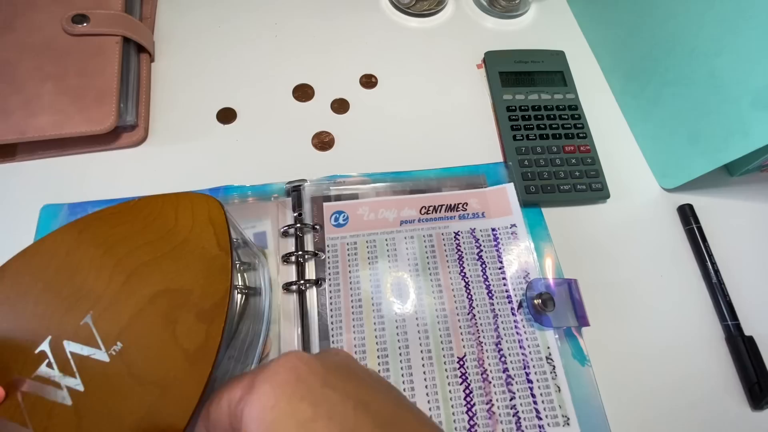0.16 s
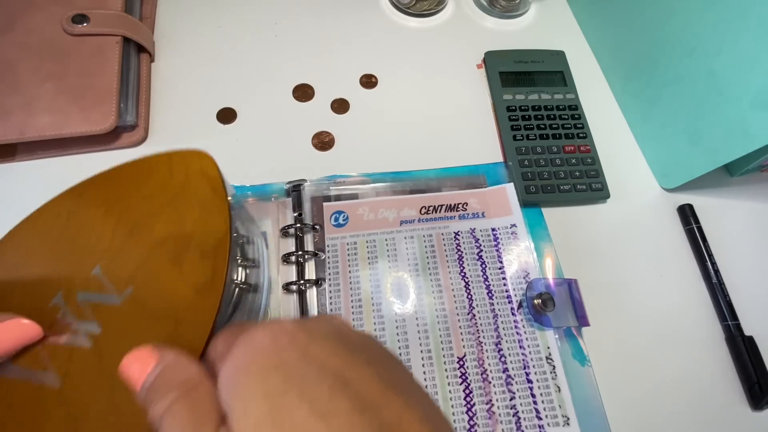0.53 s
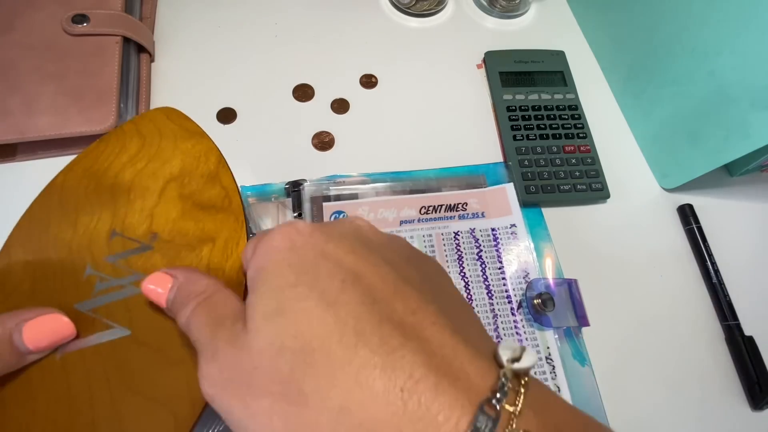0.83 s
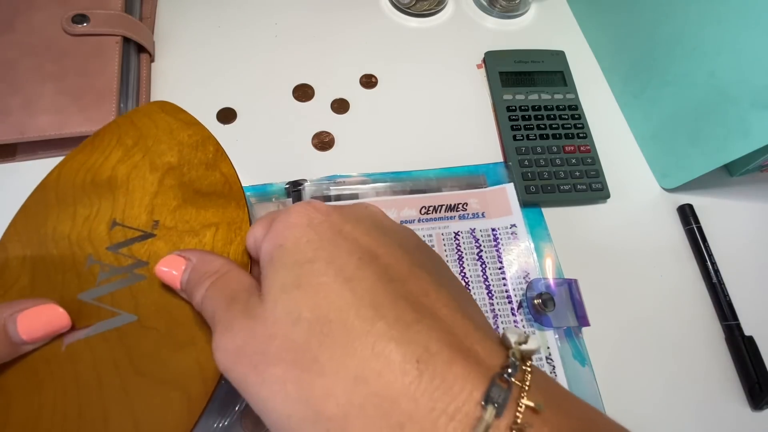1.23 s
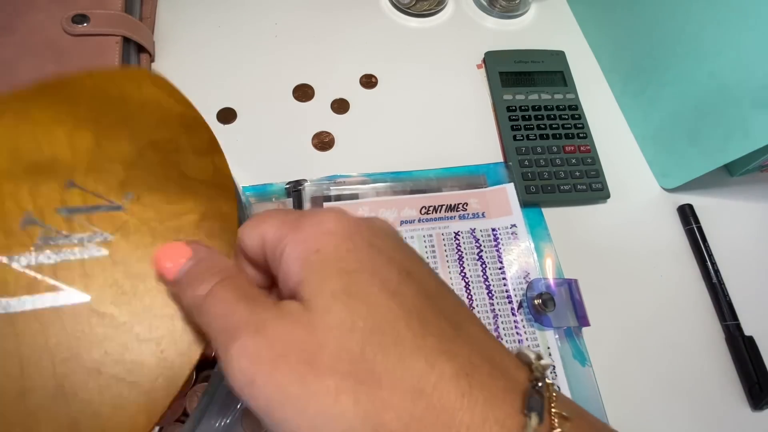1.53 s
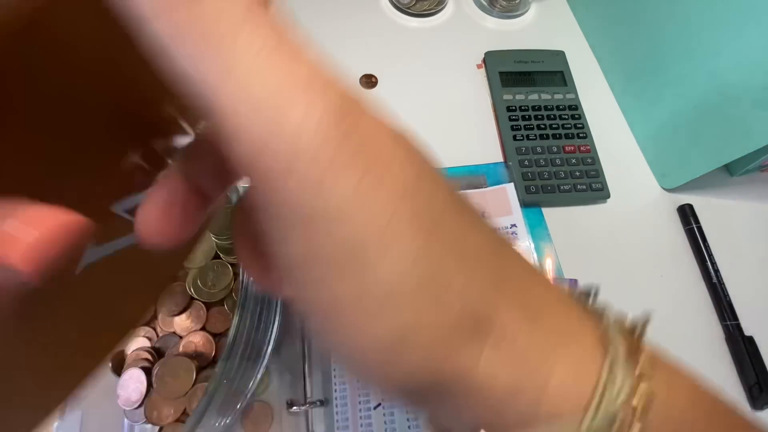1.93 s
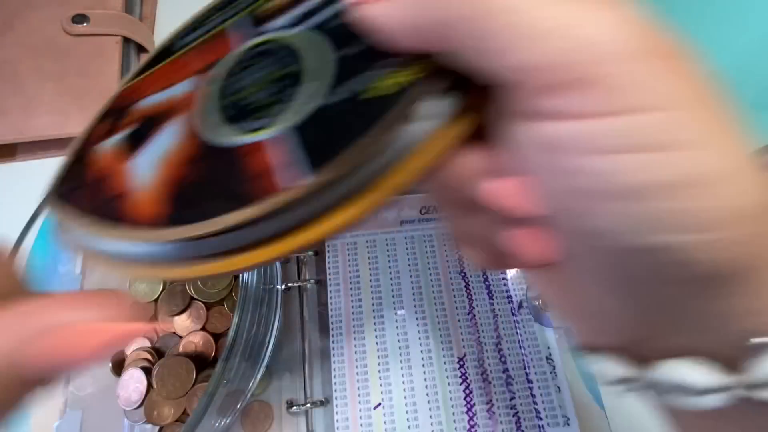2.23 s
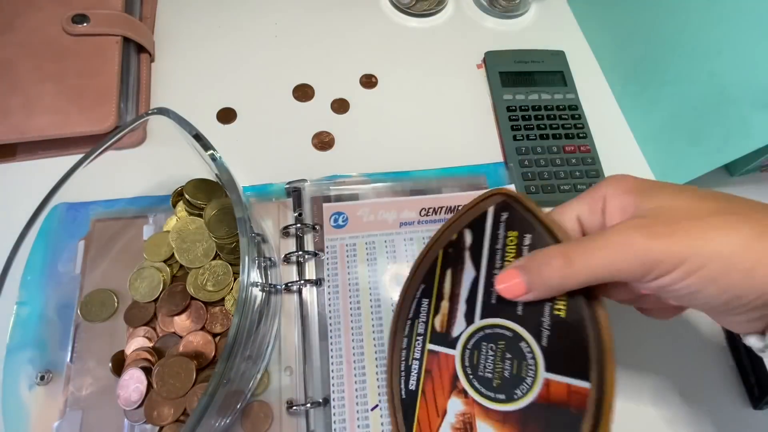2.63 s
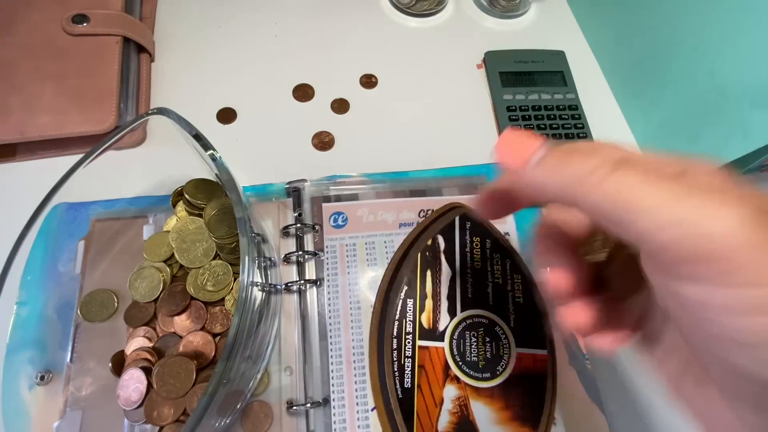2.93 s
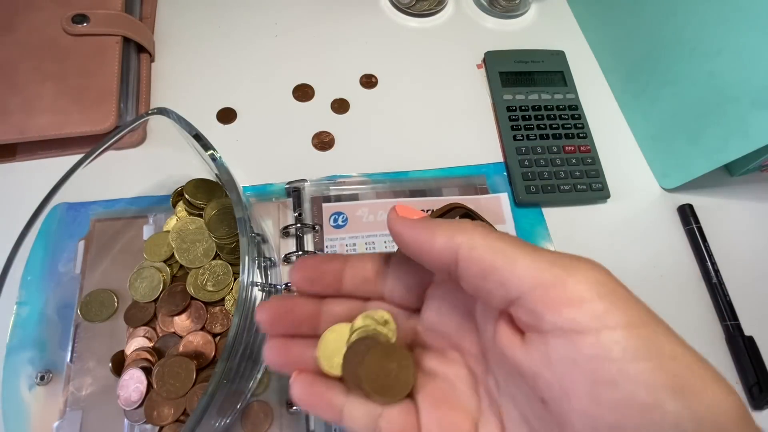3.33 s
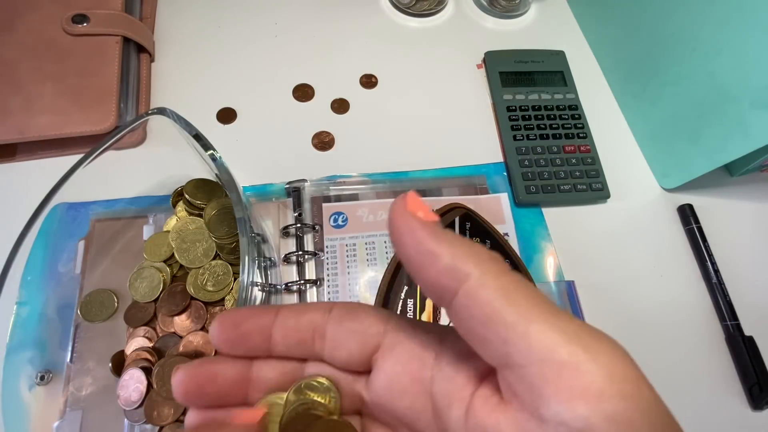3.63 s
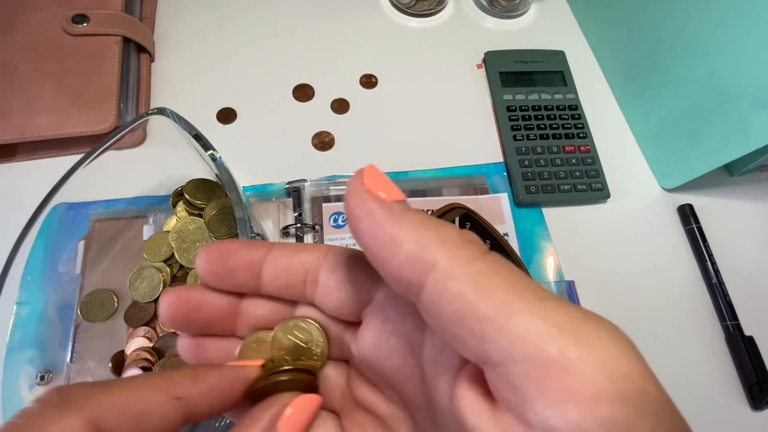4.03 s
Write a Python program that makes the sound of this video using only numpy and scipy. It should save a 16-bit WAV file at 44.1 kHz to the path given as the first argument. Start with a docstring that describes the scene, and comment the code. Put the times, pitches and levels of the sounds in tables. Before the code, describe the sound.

In a quiet room, hands slide a wooden lid across a glass bowl with soft skin hiss, small scrapes and light taps. The lid comes off with one sharp knock, then is laid on the table with a clatter and a bright click. A few coins jingle briefly in a palm, and click again as they are sorted. Everything is close to the microphone.

```python
"""A quiet room, at a table close under a stereo microphone. Hands slide and knock a wooden lid off
a glass bowl of coins, lay it on the table, then shake and sort a few coins in the palm.
Sliding skin hisses, the lid's rim catches and slips on the glass, and each knock makes wood, glass
and table ring with their own tones. The coins click dryly, with a thin, very high ring on top."""
import sys
import numpy as np
from scipy import signal
from scipy.fft import rfft, irfft
from scipy.io import wavfile
from scipy.ndimage import uniform_filter1d

SR = 44100
rng = np.random.default_rng(int(sys.argv[2]) if len(sys.argv) > 2 else 0)


def to_wav(sig):
    """Store sig (one row per channel, or 1-D mono) as 16-bit WAV at the path in sys.argv[1].

    Samples outside -1..1 are clipped; the rate is SR.
    """
    pcm = np.clip(np.atleast_2d(sig), -1, 1) * 32767
    pcm = np.round(pcm).astype(np.int16)
    wavfile.write(sys.argv[1], SR, pcm.T)  # frames by channels


N = 183941
EVENT_SAMPLES = 8192  # length of one knock, scrape or clink


def gain_of(db):
    """Turns decibels into a number to multiply by."""
    return 10 ** (np.asarray(db) / 20)


def evened(x):
    """Scales a sound to an average (rms) level of 1."""
    return x / np.sqrt(np.mean(x ** 2) + 1e-20)


def at_pitch(points, hz):
    """Reads between a table's rows at a given pitch, on a musical (log) scale."""
    pitches, values = np.transpose(points)
    return np.interp(np.log(hz + 1), np.log(pitches + 1), values)


def at_time(rows, seconds):
    """Reads between a table's rows at the given time, one result per column."""
    times, *columns = np.transpose(rows)
    return [np.interp(seconds, times, column) for column in columns]


def shaped_noise(shape, size):
    """Noise whose balance of low and high pitches follows a table."""
    hz = np.fft.rfftfreq(size, 1 / SR)
    return evened(irfft(rfft(rng.standard_normal(size)) * gain_of(at_pitch(shape, hz)), size))


def ring(tones, stretch=1., spot_hz=1000, focus_db=0., rise_ms=0.083):
    """A struck object rings with its own tones; the spot that is hit favours those near spot_hz."""
    hz, db, fade_s = np.transpose(tones)[:, :, None]  # a fade time is the time to drop by 60 dB
    t, chance = np.arange(EVENT_SAMPLES) / SR, rng.standard_normal((len(tones), 2))
    db = db + 2 * chance[:, :1] - focus_db * abs(np.log2(hz / spot_hz))
    db = db - 60 * t / (fade_s * np.clip(stretch, .1, 3))
    hz = hz * (1 + .004 * chance[:, 1:])
    sound = (gain_of(db) * np.sin(2 * np.pi * hz * t)).sum(0)
    sound *= (1 - np.exp(-t * 1000 / max(rise_ms, .05))) ** 2  # the push takes time to build
    return sound / abs(sound).max()


def crack(shape, fade_s, rise_s):
    """Two things meet with a short burst of noise."""
    t = np.arange(EVENT_SAMPLES) / SR
    return .5 * shaped_noise(shape, EVENT_SAMPLES) * gain_of(-60 * t / fade_s) * (1 - np.exp(-t / rise_s))


def chatter(sound, decay_s, share):
    """One contact is really a quick run of tiny hits, which roughens the ring."""
    t = np.arange(400) / SR
    hits = rng.standard_normal(len(t)) * np.exp(-t / decay_s)
    rattle = signal.fftconvolve(sound, hits)[:EVENT_SAMPLES]
    rough = sound + share * rattle / abs(rattle).max()
    return rough / abs(rough).max()


def stereo(left, pan_db, lag_ms):
    """The microphone's right opening hears a sound pan_db weaker and lag_ms later than its left."""
    split_hz, in_step_hz, full_turn_hz = 8600, 11080, 4100
    hz = np.fft.rfftfreq(len(left), 1 / SR)
    high = 1 / (1 + (split_hz / (hz + 1)) ** 14)
    right = (1 - high) * gain_of(-pan_db) * np.exp(-2j * np.pi * hz * lag_ms / 1000)
    # above split_hz the two openings differ by the same wave shift wherever the source is
    right += high * np.exp(2j * np.pi * (hz - in_step_hz) / full_turn_hz)
    return np.array([left, irfft(rfft(left) * right, len(left))])


def add(mix, start_s, sound, pan_db, lag_ms):
    """Places a short sound in both channels."""
    lead = 64  # spare samples before the hit
    pair = stereo(np.roll(sound, lead), pan_db, lag_ms)
    part = mix[:, round(start_s * SR) - lead:][:, :EVENT_SAMPLES]
    part += pair[:, :part.shape[1]]


# the room's background noise: (pitch [Hz], relative level [dB])
AIR_SHAPE = [(15, -42.5), (25, 0), (53, -0.5), (103, -30), (121, -25), (202, -20.5), (330, -32), (651, -36),
             (2150, -38.5), (2400, -44.5), (2600, -39), (16500, -48)]
def room_tone():
    """A steady, faint rumble and hiss, partly alike on the left and right."""
    shared, left, right = (shaped_noise(AIR_SHAPE, N) for _ in range(3))
    return gain_of(-80.5) * np.array([2.9 * (0.8 * shared + 1.3 * left), 1.9 * shared + 6.4 * right])


# sliding fingers: (start [s], end [s], hiss [dB], swish [dB], hiss change [dB], swish change [dB])
FINGER_STROKES = [(0, 0.056, -74, -78, -4, 1), (0.096, 0.196, -68, -67.5, -5, -7),
                  (0.22, 0.446, -91.5, -92, 21.5, 17.5), (0.447, 0.774, -58.5, -63, 0.5, 0.2),
                  (0.8, 0.903, -73, -83, 0, -2), (0.915, 0.974, -66, -79, -9.5, -8),
                  (1.06, 1.25, -80.5, -92, -3.5, -3), (1.356, 1.577, -57, -70.5, -17, -3),
                  (1.582, 1.854, -46, -57, -32.5, -25), (1.925, 1.964, -56, -70, -6, -3),
                  (1.968, 2.098, -77.5, -78, 15, 24.5), (2.134, 2.174, -56, -64, -6.5, -.1),
                  (2.19, 2.36, -69, -68.5, -3, 6.5), (2.397, 2.5, -80.5, -84, 4, -7),
                  (2.54, 2.784, -61, -60.5, 5, -4.5), (2.803, 3.097, -60.5, -70.5, -1.5, 10),
                  (3.1, 3.27, -72, -68.5, -17.5, -20), (3.8, 4.169, -83.5, -79, -1, 2)]
def finger_strokes():
    """How loud the skin's hiss and swish are: each stroke lands quickly, drifts in level and lets go."""
    land_s, let_go_s, arch_db = 0.018, 0.06, 3.5
    t, levels = np.arange(N) / SR, np.zeros((2, N))
    for start, end, hiss_db, swish_db, hiss_change, swish_change in FINGER_STROKES:
        touch = np.clip(np.minimum((t - start) / land_s, 1 + (end - t) / let_go_s), 0, 1)
        along = np.clip((t - start) / (end - start), 0, 1)
        pressure = gain_of(-arch_db * (2 * along - 1) ** 2)  # firmest in the middle
        drift = gain_of([hiss_db + hiss_change * along, swish_db + swish_change * along])
        levels += touch ** 2 * pressure * drift
    return levels


# the tones of table, wooden lid and glass bowl: (pitch [Hz], relative level [dB], fade time [s])
TABLE_TONES = [(60.4, -5.5, 0.13), (85.7, 0.5, 0.084), (133.7, -7, 0.12), (213, -4, 0.063)]
LID_TONES = [(299, -12.5, 0.092), (353, 1, 0.08), (461.6, -7, 0.076), (511, -5, 0.066), (581, 1.5, 0.044),
             (721, -5, .07), (801, 2, 0.041), (864, -6, 0.03), (1153, -2, 0.051), (1347, -5, 0.068)]
GLASS_TONES = [(1150, -5, .05), (1514, -2, .05), (1963, -6.5, 0.061), (2482, -5, 0.073),
               (2750, -8.5, 0.077), (2990, -2, 0.068), (3280, -8.5, .05), (3909, -5, 0.049),
               (4251, -6, 0.064), (4463, -4, 0.045), (4800, -7.5, 0.087), (5110, -7.5, 0.086)]
# the hiss of sliding skin and its thinner, higher swish: (pitch [Hz], relative level [dB])
HISS_SHAPE = [(1500, -30.5), (2500, -8), (5000, -3.5), (8000, -4), (10000, -22)]
SWISH_SHAPE = [(7000, -32), (9000, -4.5), (11500, 0), (15000, -4.5), (16200, -13), (17000, -35)]
# hands shifting the lid: (time [s], table rumble [dB], lid level [dB])
RUB_LEVELS = [(0.0, -70, -72.5), (0.24, -63.5, -77.5), (0.48, -77, -65), (0.61, -84, -65),
              (0.87, -65.5, -75), (1.16, -66, -81), (1.4, -64, -75), (1.46, -65, -73), (1.54, -61, -61.5),
              (1.61, -57, -56), (1.67, -61, -59.5), (1.8, -56.5, -61), (1.89, -58, -64.5),
              (2.11, -72.5, -77), (2.24, -79, -88), (2.45, -79, -86), (2.57, -82, -71.5), (2.68, -67, -65),
              (2.72, -64, -65.5), (2.87, -65.5, -74.5), (3.02, -71.5, -82.5), (3.31, -74, -85.5),
              (3.48, -76, -85.5), (4.17, -74, -85.5)]
def rubbing():
    """Tiny slips make the table, lid and finger-muffled glass murmur, while the skin hisses."""
    slips_per_s = 1500
    slips = gain_of(2.0 * np.minimum(rng.exponential(1, N), 5)) * (rng.random(N) < slips_per_s / SR)
    grain = evened(uniform_filter1d(slips, 60)) + 1
    hiss, swish = finger_strokes()
    table, lid = gain_of(at_time(RUB_LEVELS, np.arange(N) / SR))
    glass = gain_of(-2.5) * hiss
    out = np.zeros((2, N))
    for tones, level, stretch in (TABLE_TONES, table, .6), (LID_TONES, lid, .5), (GLASS_TONES, glass, .1):
        near, other = (signal.oaconvolve(rng.standard_normal(N) * grain, ring(tones, stretch))[:N]
                       for _ in range(2))
        pair = stereo(evened(near), pan_db=9.9, lag_ms=.45)
        pair[1] += 0.72 * evened(other)  # a wide contact sounds different on each side
        out += level * pair
    for shape, level in (HISS_SHAPE, hiss), (SWISH_SHAPE, swish):
        out += level * stereo(evened(shaped_noise(shape, N) * grain), pan_db=4.5, lag_ms=0.9)
    return out


# the lid's rim drags on the bowl: (start [s], end [s], level [dB], favoured pitch [Hz])
RIM_SCRAPES = [(0.014, 0.043, -73.5, 3600), (.02, 0.054, -63.5, 358), (0.109, 0.188, -68.5, 4050),
               (0.102, 0.141, -62, 373), (0.632, 0.808, -61, 910), (1.41, 1.431, -52.5, 2870),
               (1.591, 1.64, -61, 2480), (1.617, 1.698, -46.5, 1100), (1.665, 1.683, -44.5, 2660),
               (1.766, 1.812, -58.5, 1140), (2.103, 2.17, -66, 3090), (2.15, 2.171, -56, 3030),
               (2.158, 2.17, -50, 5180), (2.818, 2.875, -61, 2760)]
def scrapes():
    """The rim catches and slips over and over, which keeps lid and glass ringing."""
    out, t = np.zeros((2, N)), np.arange(EVENT_SAMPLES) / SR
    for start, end, db, spot_hz in RIM_SCRAPES:
        slips = rng.standard_normal(EVENT_SAMPLES) * rng.exponential(1, EVENT_SAMPLES)
        one_slip = ring(LID_TONES + GLASS_TONES, spot_hz=spot_hz, focus_db=16.0)
        scrape = evened(signal.fftconvolve(slips, one_slip)[2000:2000 + EVENT_SAMPLES])
        fade_in = np.clip(t / 0.008, 0, 1)
        fade_out = gain_of(-60 * np.maximum(t - (end - start), 0) / 0.026)
        add(out, start, gain_of(db) * scrape * fade_in * fade_out, pan_db=8.0, lag_ms=.12)
    return out


# the tick of a knock: (pitch [Hz], relative level [dB])
TICK_SHAPE = [(590, -60), (1000, -30.5), (1680, -3.5), (4930, -6), (9510, -8), (11300, -12.5),
              (13200, -14.5), (15200, -20), (15900, -21.5), (16500, -36)]
# the lid travels from the left to below the microphone (positive pan is left):
# (time [s], lid pan [dB], lid lag [ms], glass pan [dB], glass lag [ms])
LID_TRAVEL = [(0, 11, 0.27, 8, .15), (.9, 3.5, .44, 6.5, 0.19), (1.4, 6.5, 0.49, 11.5, 0.29),
              (1.6, 4, 0.36, 12.5, 0.16), (1.95, 4, 0.46, 13.5, .33), (2.4, 3, 0.1, .8, 0.12),
              (2.9, -2.7, .03, 4, 0.074)]
# the lid's knocks: (time [s], table thump [dB], lid level [dB], favoured lid pitch [Hz],
# glass level [dB], favoured glass pitch [Hz], tick level [dB], contact softness [ms])
LID_KNOCKS = [(0.026, -51, -60, 380, -60, 4450, -54, 1.3), (0.076, -53, -74, 320, -80, 4390, -51, 1.1),
              (0.102, -49, -72, 368, -74, 3450, -50, 0.73), (0.437, -56, -44, 350, -49, 4770, -46.5, 1.6),
              (0.482, -60, -48, 296, -65, 3000, -38, 0.98), (0.526, -64, -44, 945, -39.5, 2780, -44, 1.3),
              (0.657, -49.5, -40.5, 930, -59, 2480, -45.5, 1.4),
              (0.912, -44.5, -38.5, 720, -39, 2500, -40, 0.5),
              (1.105, -43.5, -57, 343, -59, 2780, -55.5, 2.9),
              (1.322, -74.5, -71.5, 600, -56, 3900, -66, 1.2),
              (1.178, -62, -52, 1260, -58.5, 1450, -78, 0.5),
              (1.368, -37.5, -36.5, 327, -44, 1540, -43, 3.9), (1.39, -61.5, -34, 570, -41.5, 2880, -35, 2),
              (1.397, -42, -27.5, 590, -37, 2900, -23.5, 1.6), (1.441, -47, -34, 580, -59, 2320, -48, 1.7),
              (1.472, -62, -68, 520, -61, 3000, -57, 0.77), (1.49, -63, -57, 610, -74, 2580, -40, 0.78),
              (1.5731, -27.5, -8.5, 1151, -19, 2480, -12.5, 0.85),
              (1.687, -40.5, -27.5, 1130, -57, 2900, -34.5, 0.64),
              (1.731, -39, -28, 686, -35.5, 2640, -44.5, 1.8), (1.829, -63, -41, 309, -51, 2840, -57, 1.2),
              (1.842, -50, -37.5, 1150, -48, 2900, -56, 2.4), (1.919, -37, -26, 1290, -34, 4280, -29, 1.43),
              (2.097, -56.5, -49, 324, -32.5, 2800, -28.5, 0.44),
              (2.429, -71.5, -80, 800, -74.5, 3000, -65.5, 1.28),
              (2.483, -92, -73, 777, -53, 4270, -69.5, 1.2),
              (2.521, -36.5, -29.5, 830, -30, 1550, -20.5, 0.93),
              (2.535, -46.5, -41, 1415, -49.5, 2560, -31, 1.5),
              (2.548, -42.5, -40, 403, -43, 4400, -40, 0.39),
              (2.613, -52, -41.5, 301, -49, 4980, -39, 0.25), (2.682, -60, -50, 575, -50, 3940, -35, 1.4),
              (2.775, -52, -47.5, 1160, -36, 2000, -51.5, 0.87),
              (2.7811, -48.5, -32.5, 1230, -4.5, 3300, -4, 1.2)]
def knocks():
    """Each knock ticks and rings lid and glass at once; the table's thump swells a little later."""
    out = np.zeros((2, N))
    for start, table_db, lid_db, lid_hz, glass_db, glass_hz, tick_db, soft_ms in LID_KNOCKS:
        lid_stretch = 0.54 + 0.0254 * (lid_db + 38.5)  # harder knocks ring longer
        glass_stretch = 0.62 + 0.005 * (lid_db + 41)
        lid = ring(LID_TONES, lid_stretch, lid_hz, focus_db=13.0, rise_ms=soft_ms)
        lid = gain_of(lid_db) * chatter(lid, decay_s=0.0007, share=0.65)
        thump = gain_of(table_db) * ring(TABLE_TONES, rise_ms=8.0)
        glass = ring(GLASS_TONES, glass_stretch, glass_hz, focus_db=6.4, rise_ms=.3 * soft_ms)
        glass = gain_of(glass_db) * chatter(glass, decay_s=0.0011, share=0.39)
        tick = gain_of(tick_db) * crack(TICK_SHAPE, fade_s=.02, rise_s=soft_ms * .0002)
        lid_pan_db, lid_lag_ms, glass_pan_db, glass_lag_ms = at_time(LID_TRAVEL, start)
        add(out, start, lid + thump, lid_pan_db, lid_lag_ms)
        add(out, start, glass + tick, glass_pan_db, glass_lag_ms)
    return out


# a coin's low and middle tones: (pitch [Hz], relative level [dB], fade time [s])
COIN_LOW_TONES = [(3900, -8, .01), (5300, -2, .012), (5900, -3, .012), (6500, 0, .014), (7300, -1, .014),
                  (8600, -6, .008)]
COIN_MID_TONES = [(9420, -11, 0.013), (10030, -8, 0.0074), (10540, -11, 0.01), (11180, -9, 0.0086),
                  (12520, -9.5, 0.011)]
# the crack of coin on coin: (pitch [Hz], relative level [dB])
TAP_SHAPE = [(470, -59.5), (800, -38), (1830, -19.5), (2950, -16), (6530, 0.5), (9270, -5.5),
             (11800, -12.5), (13000, -25)]
# the palm drifts to the left: (time [s], pan [dB], lag [ms])
PALM_TRAVEL = [(2.9, 4.5, 0.046), (3.3, 9, 0.11), (3.9, 14, .14)]
# coins meeting: (time [s], tap [dB], middle ring [dB], top ring [dB], top pitch [Hz])
COIN_CLINKS = [(2.896, -49, -61, -82, 15150), (2.915, -48, -41, -60, 15740), (2.9194, -36, -61, -55, 15800),
               (2.9252, -37, -41, -33.5, 15400), (2.9347, -36, -53, -36, 14600),
               (2.94, -38, -36, -36, 15000), (2.9541, -23.5, -27, -38, 15600),
               (2.959, -32, -44, -22, 15900), (2.9699, -22, -31, -19, 15380),
               (2.9752, -21, -33, -45, 15500), (2.979, -23, -41, -29, 15560),
               (2.9857, -22, -22, -24, 15720), (2.9903, -22, -19, -12.5, 15700),
               (2.998, -15, -39, -14, 15740), (3.0042, -20, -17, -18, 15630),
               (3.0109, -13.5, -21, -13, 15830), (3.0172, -24.5, -20, -32, 15650),
               (3.0196, -35, -40, -21, 15150), (3.0276, -31, -40.5, -22, 15200),
               (3.059, -32, -32, -33, 15000), (3.065, -37, -33.5, -38.5, 15160),
               (3.072, -42.5, -33.5, -31, 15200), (3.0954, -38, -31.5, -34.5, 15400),
               (3.1063, -53.5, -45, -56.5, 15500), (3.131, -41.5, -51, -55.5, 15540),
               (3.165, -51, -54.5, -53.5, 15600), (3.1953, -35, -41, -47.5, 15160),
               (3.2007, -50, -46.5, -57, 15470), (3.2102, -43, -60, -50, 15810),
               (3.2335, -49.5, -56.5, -79, 15820), (3.2906, -46.5, -52.5, -63.5, 15360),
               (3.635, -58, -62.5, -63.5, 15400), (3.6463, -38.5, -44, -28, 15540),
               (3.6553, -44, -55.5, -42, 15600), (3.6728, -44, -46.5, -34, 15100),
               (3.6976, -55.5, -64, -66, 15600), (3.8251, -50, -52, -46.5, 15480),
               (3.8599, -43.5, -56, -71, 15930), (3.867, -38.5, -38.5, -34, 14940),
               (3.8752, -26, -14.5, -14.5, 15760), (3.8798, -22.5, -18, -25.5, 15560),
               (3.9, -36, -42, -40, 15630), (3.914, -34, -34.5, -41.5, 15600),
               (3.9179, -26.5, -17.5, -34, 15300), (4.034, -52.5, -61.5, -73.5, 15540),
               (4.0939, -67.5, -60, -75.5, 15270), (4.147, -63, -56, -80.5, 15900),
               (4.1588, -53.5, -54, -76, 15400)]
def coins():
    """Coins muffled by the palm click dryly; only their two top tones sing, until the next hit."""
    airborne_until_s, airborne_fade_s, held_fade_s = 3.04, 0.061, .017  # tossed coins sing longer
    out, t = np.zeros((2, N)), np.arange(EVENT_SAMPLES) / SR
    gaps_s = np.diff(np.transpose(COIN_CLINKS)[0], append=N / SR)
    for (start, tap_db, mid_db, top_db, top_hz), gap_s in zip(COIN_CLINKS, gaps_s):
        brightness, side = rng.standard_normal(2)
        tap_hz = 6080 + 55 * (tap_db + 33) + 430 * brightness  # harder taps are brighter
        low = chatter(ring(COIN_LOW_TONES, spot_hz=tap_hz, focus_db=26.0), decay_s=0.0025, share=1.0)
        tap = gain_of(tap_db) * (.5 * low + crack(TAP_SHAPE, fade_s=0.023, rise_s=0.000067))
        fade_s = airborne_fade_s if start < airborne_until_s else held_fade_s
        top = ring([(top_hz, 0, fade_s), (top_hz * .969, -10, fade_s), (14700, -12, .008)])
        wobble_db = 4.0 * evened(uniform_filter1d(rng.standard_normal(EVENT_SAMPLES), 90))
        top *= gain_of(top_db + wobble_db)  # sliding contact shakes the ring
        top *= 1 - np.exp(-t / 0.00064)
        top *= gain_of(-60 * np.maximum(t - gap_s, 0) / 0.013)  # the next hit stops it
        mid = gain_of(mid_db) * chatter(ring(COIN_MID_TONES), decay_s=0.00057, share=1.08)
        pan_db, lag_ms = at_time(PALM_TRAVEL, start)
        add(out, start, tap + mid + top, pan_db + 2.5 * side, lag_ms)
    return out


# how long the room echoes: (pitch [Hz], fade time [s])
ECHO_FADES = [(100, .35), (500, 0.2), (2000, 0.26), (6000, 0.42), (15000, 0.097)]
def room_echo(sound):
    """The walls send back many small echoes, and each pitch dies away at its own speed."""
    echoes = np.zeros((2, 16000))
    arrivals = np.arange(120, 15980, 20) + rng.integers(0, 20, (2, 793))
    np.put_along_axis(echoes, arrivals, rng.choice([-1., 1.], arrivals.shape), 1)
    hz, t, bands = signal.stft(echoes, SR, nperseg=256)
    bands = bands * gain_of(-60 * t / at_pitch(ECHO_FADES, hz)[:, None])
    tail = signal.istft(bands, SR, nperseg=256)[1]
    return signal.fftconvolve(sound, tail / np.linalg.norm(tail[0]), axes=1)[:, :N]


def scene():
    """The close sounds, their echoes and the room's background noise."""
    lid, clinks = knocks() + scrapes(), coins()
    to_walls = gain_of(-12) * lid + gain_of(-20) * clinks  # the cupped palm shields the coins
    return lid + clinks + rubbing() + room_echo(to_walls) + room_tone()


def record(dry):
    """The microphone drops the deepest bass; then the very highest treble is cut."""
    lowest_hz, highest_hz = 40, 17100
    bass_cut = signal.butter(5, lowest_hz, "high", fs=SR, output="sos")
    treble_cut = signal.firwin(511, highest_hz, window=("kaiser", 9), fs=SR)
    return signal.oaconvolve(signal.sosfilt(bass_cut, dry), treble_cut[None], "same")


dry = scene()
out = record(dry)
to_wav(out)
```